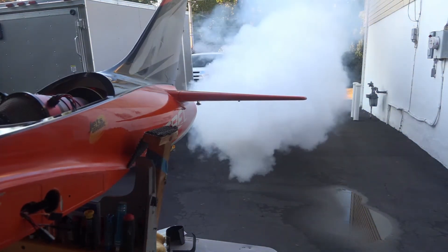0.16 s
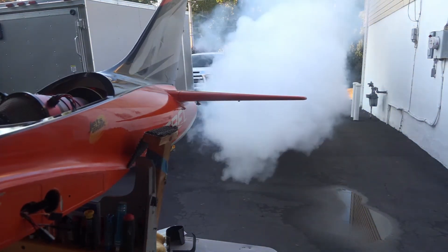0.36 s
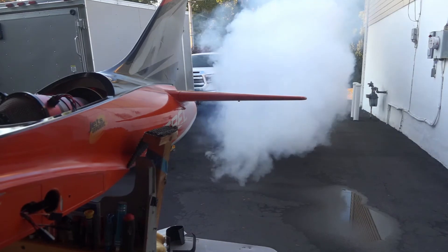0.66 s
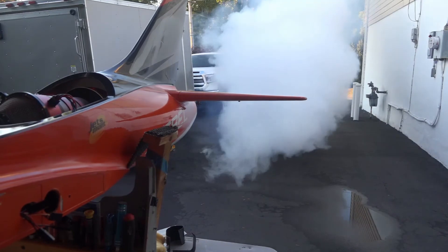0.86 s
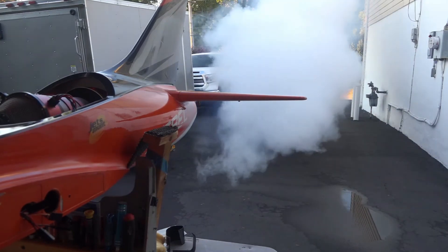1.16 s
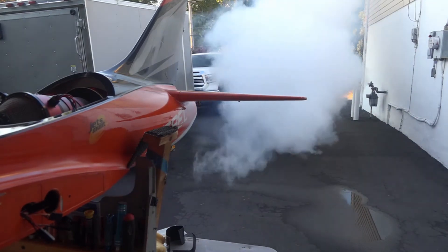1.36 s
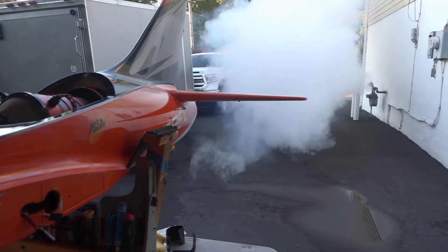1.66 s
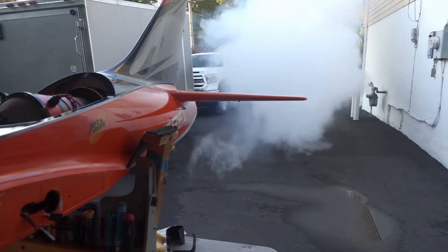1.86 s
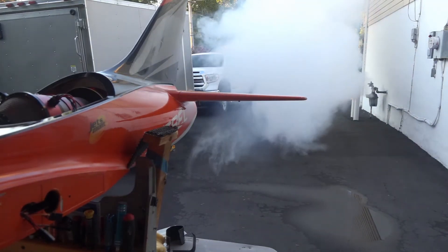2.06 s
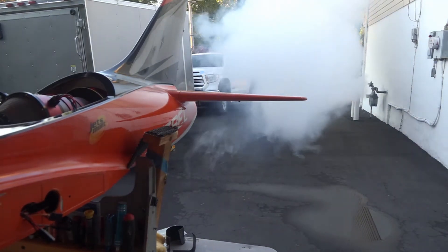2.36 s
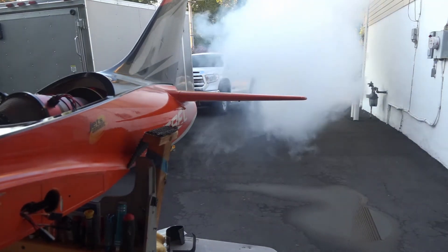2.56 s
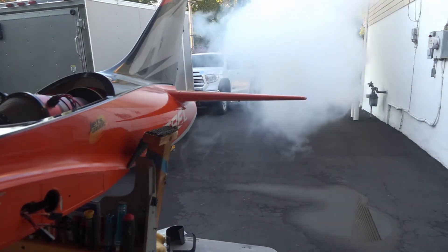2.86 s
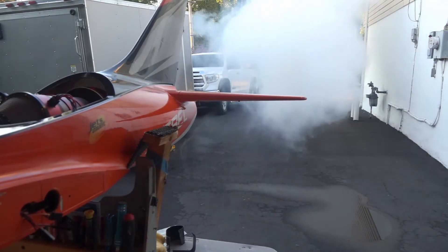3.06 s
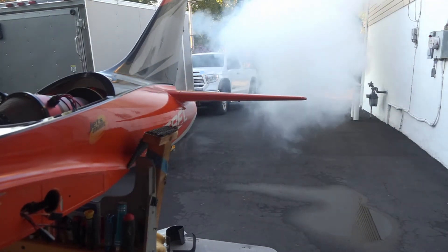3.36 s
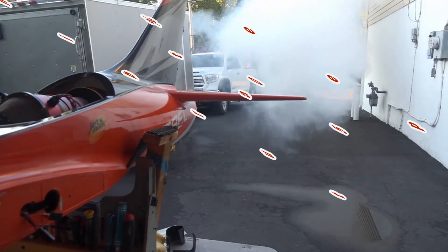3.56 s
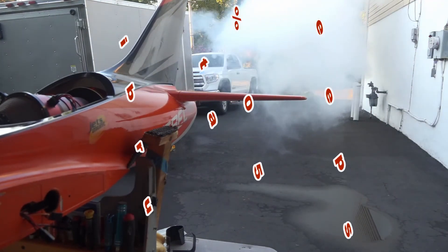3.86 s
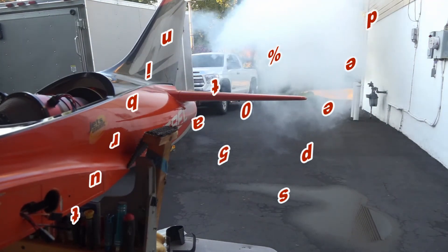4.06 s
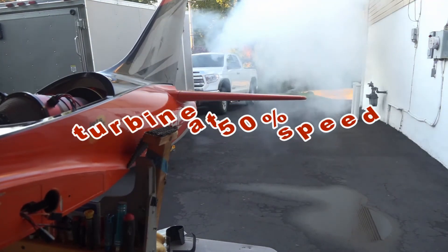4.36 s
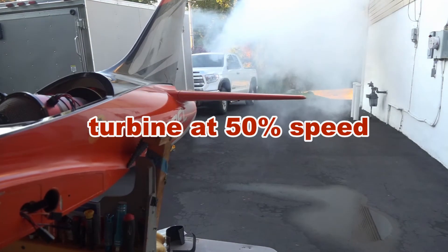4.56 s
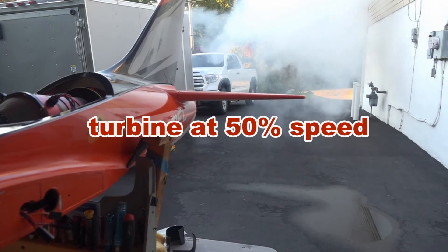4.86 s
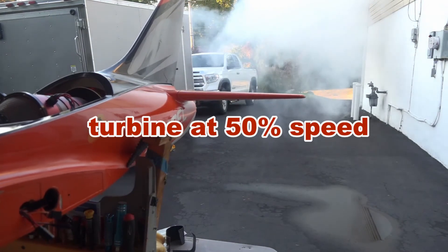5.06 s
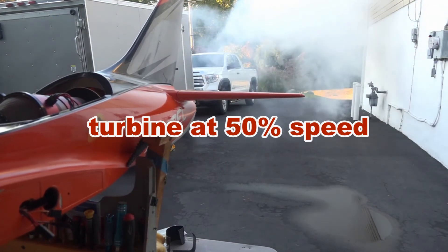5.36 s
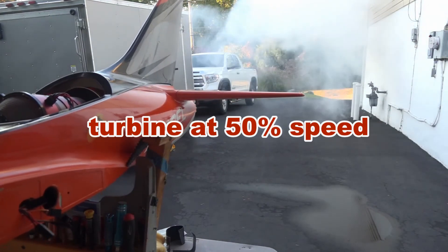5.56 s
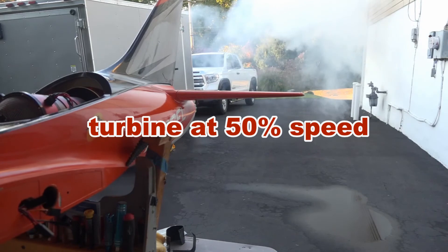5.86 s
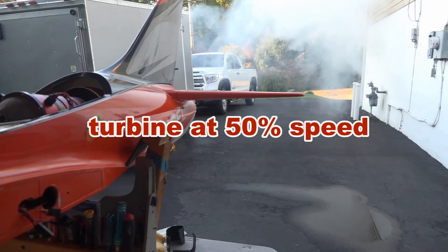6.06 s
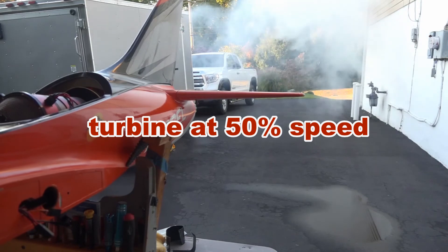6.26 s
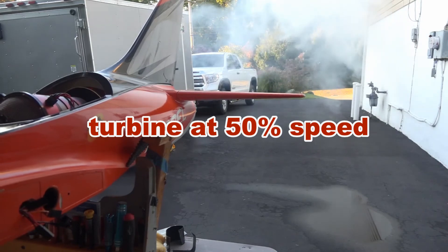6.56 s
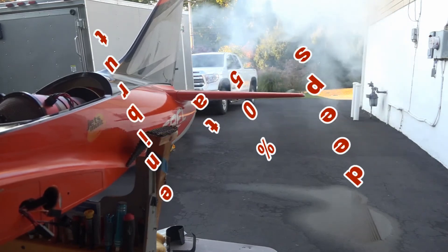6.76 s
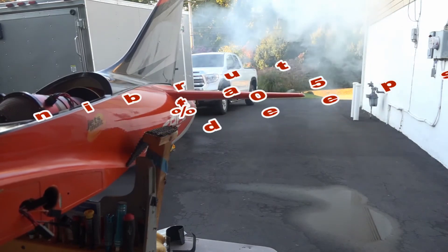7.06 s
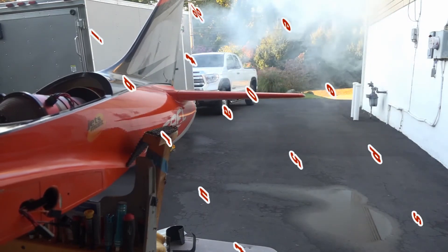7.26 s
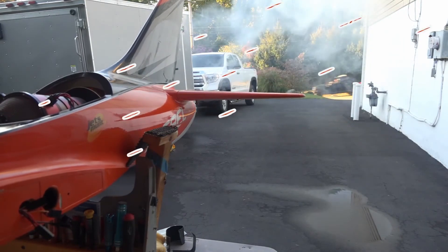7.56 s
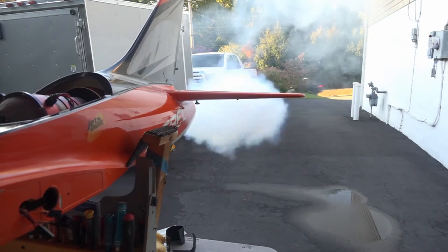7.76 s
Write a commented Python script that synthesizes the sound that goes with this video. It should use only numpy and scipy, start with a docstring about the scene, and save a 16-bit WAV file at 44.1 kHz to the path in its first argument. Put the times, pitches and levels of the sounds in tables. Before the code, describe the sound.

Outdoors on hard ground beside a wall, a small jet turbine is heard close up in stereo. From 0 to about 3.2 seconds it holds a low speed: a piercing whistle near 9 kHz dominates, with a fainter whine an octave below near 4.5 kHz, both trembling in hot turbulent air. Beneath is a broad, grainy exhaust roar and hiss, with a tiny spit near 1.6. From about 3.3 the turbine gathers speed; a soft low rumble swells around 4 to 4.5 and fades, with another short spit at 3.8. The tones glide up along an S-shaped curve, the upper passing out of hearing around 4.5 to 5. The exhaust grows brighter but is held back by automatic gain. By 6 to 7 seconds the lower whine eases to a strong, steadier pitch near 7.8 kHz, over continuous rushing exhaust until the end.

```python
"""A model jet's turbine on the tarmac beside a wall: first it holds a low speed, hunting gently.
Rotor tones at once and twice the turning rate flutter in hot, turbulent air over exhaust noise bands.
Past 3 s it spools up along an S-shaped ramp; low-passed noise rumbles briefly as fuel is added.
The exhaust changes colour with speed; the upper tone climbs past the cut-off, out of hearing.
It still drives the gain control, which pushes the exhaust down; the speed settles high."""
import sys
import numpy as np
from scipy.fft import rfft, irfft, next_fast_len
from scipy.io import wavfile
from scipy.ndimage import uniform_filter1d, minimum_filter1d

SR = 44100
rng = np.random.default_rng(int(sys.argv[2]) if len(sys.argv) > 2 else 0)


def file_out(sig):
    """Save sig as 16-bit WAV at sys.argv[1]."""
    # one column per channel
    cols = np.atleast_2d(sig).T
    # limit, then scale
    lim = np.clip(cols, -1, 1)
    pcm = np.round(lim * 32767).astype(np.int16)
    wavfile.write(sys.argv[1], SR, pcm)


N = 348390
TIME_S = np.arange(N) / SR
SIZE = next_fast_len(N + 4096)
HZ = np.maximum(np.arange(SIZE // 2 + 1) * SR / SIZE, 1)

# All half widths are to 1/e of the bump. Levels are ahead of the gain control.
# flame rumble as fuel is added: t/s, rms level/dB
FLAME = [(0, -72), (3.4, -63), (4.05, -46), (4.35, -43), (5, -54), (6.2, -71)]
# relative exhaust spectrum at low and high speed: f/Hz, density/dB
JET_SLOW = [(25, -29), (60, -14), (100, 5), (215, -15), (440, -5), (520, -0.5), (750, -8), (1500, 0),
            (1850, -2), (4100, -3), (4900, -1), (6200, 3), (7500, 0), (11000, -1.5)]
JET_FAST = [(25, -34), (60, -32), (100, -13), (215, -8), (450, -5), (530, -3), (700, -0.5), (1450, 2),
            (1750, -3.5), (3400, -2.5), (4400, 0.5), (6800, -1), (8400, 1), (11000, 0)]
# tailpipe and airframe resonances, on the same scale:
# f/Hz, width scale/Hz, level/dB at low, middle, high speed
PIPE = [(112, 27, 3, -5, -16), (162.4, 47, 19, 9, 7), (277.4, 51, 4, 1, -1), (313, 56, 1, 5, 2.5),
        (372.7, 65, -0.5, 4, 8.5), (508, 78, -1.5, 1, 0.5), (597, 18, 1.5, 2, -9), (656, 35, 2, -3, -23),
        (952, 278, 4.5, 2.5, -4), (1123, 125, -2.5, -5, 7), (1221, 83, 5.5, 5, 7), (1345, 60, 6, 10, 5),
        (1467, 36, 1, -15, 5), (1996, 200, -11, 0, -5.5), (4920, 230, 3, -19, -5)]
# low, middle, high speed: speed/(turns/s)
CORNER_SPEEDS = [4920, 6120, 7790]
# left-right correlation of the exhaust: f/Hz, correlation/1
LIKENESS = [(30, 0.53), (70, 0.74), (140, 0.94), (500, 0.93), (1400, 0.92), (2700, 0.82), (4500, 0.76),
            (10000, 0.98)]
# exhaust balance: f/Hz, left minus right level/dB
BALANCE = [(140, 0.3), (1200, -1.1), (4000, -0.5), (5500, 0), (8000, 0.5), (10500, 1)]
# reflections off ground, fuselage and wall: delay/s, gain/1
ECHOES = [(.00312, .13), (.00345, .11), (.0055, .06), (.0079, .08), (.0131, .04), (.0198, .04)]
# exhaust swells and sags: t/s, half width/s, rumble change/dB, roar change/dB, hiss change/dB
SURGES = [(0.014, 0.1, -4.5, -1, -.7), (.72, 0.18, 0.5, 1, 0.5), (1.94, .09, 3.5, .3, -0.2),
          (3.062, 0.14, -1.5, -1, -1.2), (3.274, .12, 3, 0, 0), (3.5, 0.049, -11, -.5, -2.2),
          (3.717, 0.21, -3.5, 0, -3.3), (4.1, 0.12, -5, 1, -1.5), (4.298, 0.11, -3.5, 0, -3.2),
          (4.825, .12, 2, 0, -0.5), (5.484, 0.13, 1, 1, 0), (6.083, 0.077, 5, 2.5, 1),
          (7.14, 0.098, -8, -.8, -0.5)]
# short exhaust spits: t/s, half width/s, hiss change/dB
SPITS = [(1.584, 0.0037, 7), (3.821, 0.005, 8)]
# source levels: rms level/dB at low, middle, high speed
RUMBLE_DB = (-29.5, -22.5, -26)
ROAR_DB = (-25, -15, -14.5)
HISS_DB = (-20, -10.5, -7.5)
WHINE_DB = (-28, -23, -5.5)
# direct and reflected paths adding or cancelling, whine: speed/(turns/s), half width/(turns/s), level/dB
WHINE_PATHS = [(5100, 190, 2.5), (5760, 230, 7), (6130, 140, -9), (6500, 32, 0), (6980, 60, -4),
               (7170, 80, 2.5)]
# same for the shriek: speed/(turns/s), half width/(turns/s), left level/dB, right level/dB
SHRIEK_PATHS = [(4684, 88, 3.5, 3), (4970, 70, 2.5, -15), (5050, 150, -11.5, -7.5), (5330, 57, 0, 3),
                (6430, 150, 4.5, 4)]
# shriek leaning right at low speed: t/s, half width/s, left minus right level/dB
SHRIEK_PAN = [(1.5, 0.83, -2.5)]

LOW_TURNS_PER_S, HIGH_TURNS_PER_S = 4490, 7852.5
THROTTLE_UP_S, SPOOL_S, EASE_IN, EASE_OUT = 3.259, 3.969, 1.849, 3.386
HUNT_TURNS_PER_S, HUNT_PERIOD_S = 12, 3.1   # the governor lets the low speed swell and sink
HOLLOW_HZ, HOLLOW_WIDTH_HZ, HOLLOW_DB = 2820, 214, -4   # dip in the jet spectrum
SHRIEK_DB, SHRIEK_DB_PER_OCTAVE = -8, 14.5   # rms at LOW_TURNS_PER_S, growth with speed
SCATTER, SCATTER_DB_PER_DB = 0.076, 0.7   # scattered share; its rise per dB of path cancellation
FADE_HZ = 15   # pace of the large eddies
PORT_LAG_S = 2.3e-5   # right port after left
AGC_THRESHOLD_DB, AGC_SHARE, AGC_WINDOW_S = -9.5, .9, 0.17   # rms, share of excess removed
CUTOFF_HZ = 11020


def from_db(db):
    """Decibels to gain."""
    return 10 ** (np.asarray(db) / 20)


def rms_one(x):
    """Scale to unit rms."""
    return x / np.sqrt(np.mean(x ** 2) + 1e-20)


def in_time(rows):
    """Each column of a time table, interpolated per sample."""
    t_s, *columns = np.transpose(rows)
    return [np.interp(TIME_S, t_s, column) for column in columns]


def in_frequency(points):
    """A spectrum per bin, interpolated over log frequency."""
    hz, value = np.transpose(points)
    return np.interp(np.log(HZ), np.log(hz), value)


def bumps(along, rows):
    """Sum of Gaussian bumps from rows of (centre, half width, heights ..): one curve per height."""
    return sum(np.outer(heights, np.exp(-((along - centre) / width) ** 2))
               for centre, width, *heights in rows)


def white():
    """Spectrum of a fresh white noise."""
    return rfft(rng.standard_normal(SIZE))


def eddies(rate_hz):
    """Turbulent wandering of unit rms, fading above the given rate."""
    return rms_one(irfft(white() / (1 + (HZ / rate_hz) ** 2), SIZE)[:N])


def flame(top_hz):
    """Combustion rumble: band-limited noise, partly different at each ear."""
    pair = white() + .5 * white() * [[1], [-1]]
    pair = pair * HZ / (HZ + 150) / (1 + (HZ / top_hz) ** 4)
    level_db = in_time(FLAME)[0]
    return from_db(level_db) * rms_one(irfft(pair, SIZE)[:, :N])


def jet_noise(colour_db, mode_db):
    """Stereo spectrum of mixing noise plus pipe resonances, rippled by reflections."""
    hollow_db = HOLLOW_DB * np.exp(-((HZ - HOLLOW_HZ) / HOLLOW_WIDTH_HZ) ** 2)
    power = from_db(colour_db + hollow_db) ** 2
    for (hz, width_hz, *_), db in zip(PIPE, mode_db):
        offset = ((HZ - hz) / width_hz) ** 2
        power = power + from_db(db) ** 2 / (1 + 2.0 * offset + 3.0 * offset ** 2) ** 2

    alike = np.clip(in_frequency(LIKENESS), 0, .99)
    pair = np.sqrt(1 + alike) * white() + np.sqrt(1 - alike) * white() * [[1], [-1]]
    pair[1] *= np.exp(-2j * np.pi * HZ * PORT_LAG_S)
    pair *= from_db(in_frequency(BALANCE) / 2 * [[1], [-1]])

    paths = np.zeros(SIZE)
    for delay_s, gain in [(0.00014, 1)] + ECHOES:   # direct path first
        paths[round(delay_s * SR)] = gain
    return pair * np.sqrt(power) * rfft(paths)


def exhaust(speed):
    """Rumble, roar and hiss: jet noise in three bands, crossfading in colour with rotor speed."""
    slow, fast = in_frequency(JET_SLOW), in_frequency(JET_FAST)
    colours = (slow, (slow + fast) / 2, fast)
    modes = np.transpose(PIPE)[2:]
    states = [jet_noise(colour, mode_db) for colour, mode_db in zip(colours, modes)]
    shares = [np.interp(speed, CORNER_SPEEDS, corner) for corner in np.eye(len(states))]
    rumble_db, roar_db, hiss_db = bumps(TIME_S, SURGES)
    surge = eddies(19)   # shared by all bands

    def band(low_hz, high_hz, level_db, events_db, surge_db):
        """One band, its level following speed, events and shared turbulence."""
        inside = (HZ >= low_hz) & (HZ < high_hz)
        blend = 0
        for share, state in zip(shares, states):
            blend = blend + np.sqrt(share) * rms_one(irfft(state * inside, SIZE)[:, :N])
        speed_db = np.interp(speed, CORNER_SPEEDS, level_db)
        return blend * from_db(speed_db + events_db + surge_db * surge)

    rumble = band(15, 220, RUMBLE_DB, rumble_db, surge_db=-0.6)
    roar = band(220, 1700, ROAR_DB, roar_db, surge_db=1.12)
    hiss = band(1700, 12000, HISS_DB, hiss_db + bumps(TIME_S, SPITS), surge_db=0.8)
    return rumble + roar + hiss


def shaft_speed():
    """Turns per second: hunting gently, then gathering speed and easing into the high setting."""
    ramp = np.clip((TIME_S - THROTTLE_UP_S) / SPOOL_S, 0, 1)
    to_go = (1 - ramp ** EASE_IN) ** EASE_OUT
    low = LOW_TURNS_PER_S + HUNT_TURNS_PER_S * np.abs(np.sin(np.pi * TIME_S / HUNT_PERIOD_S))
    return HIGH_TURNS_PER_S + to_go * (low - HIGH_TURNS_PER_S)


def rotor_tone(speed, order, flutter, flutter_hz, apart, fade_db):
    """A multiple of the turning rate; eddies scatter level and phase, partly otherwise at each ear."""
    turns = np.cumsum(speed) / SR - speed * PORT_LAG_S * np.array([[0], [1]])
    shared, own_left, own_right = (eddies(flutter_hz) + 1j * eddies(flutter_hz) for _ in range(3))
    scatter = flutter * (shared + apart * np.array([own_left, own_right]))
    # now and then a large hot eddy bends the beam away
    large = 0.7 * eddies(FADE_HZ) + .5 * np.array([eddies(FADE_HZ), eddies(FADE_HZ)])
    fade = from_db(-fade_db * np.maximum(large - .5, 0) ** 2)
    carrier = np.exp(2j * np.pi * order * turns)
    return np.sqrt(2) * fade * np.real((1 + scatter) * carrier)


def whine(speed):
    """Once-a-turn tone: louder and steadier with speed, coloured by path interference."""
    flutter = np.interp(speed, CORNER_SPEEDS, [.23, .12, .05])
    level_db = np.interp(speed, CORNER_SPEEDS, WHINE_DB) + bumps(speed, WHINE_PATHS)
    tone = rotor_tone(speed, order=1, flutter=flutter, flutter_hz=40, apart=1.0, fade_db=1.4)
    return from_db(level_db) * tone


def shriek(speed):
    """Twice-a-turn tone, growing with speed; its scattered share rises where the paths cancel."""
    paths_db = bumps(speed, SHRIEK_PATHS)
    pan_db = bumps(TIME_S, SHRIEK_PAN) / 2 * np.array([[1], [-1]])
    growth_db = SHRIEK_DB_PER_OCTAVE * np.log2(speed / LOW_TURNS_PER_S)
    level_db = SHRIEK_DB + growth_db + pan_db + paths_db
    cancelled_db = np.minimum(paths_db.mean(axis=0), 0)
    flutter = SCATTER * from_db(-SCATTER_DB_PER_DB * cancelled_db)
    tone = rotor_tone(speed, order=2, flutter=flutter, flutter_hz=42.8, apart=1.0, fade_db=2.0)
    return from_db(level_db) * tone


def scene():
    """Exhaust and flame under the rotor's two tones."""
    speed = shaft_speed()
    return exhaust(speed) + flame(top_hz=95) + whine(speed) + shriek(speed)


def gain_control(x):
    """Cuts most of the mean power's excess over the threshold: exhaust sinks as the shriek swells."""
    power = uniform_filter1d(np.mean(x ** 2, axis=0), max(int(AGC_WINDOW_S * SR), 1))
    excess_db = np.maximum(10 * np.log10(np.abs(power) + 1e-12) - AGC_THRESHOLD_DB, 0)
    return x * from_db(-np.clip(AGC_SHARE, 0, 1) * excess_db)


def record(dry):
    """Recorder chain: gain control, quick peak limiter, steep low-pass."""
    held = gain_control(dry)
    room = np.minimum(1, .95 / (np.abs(held).max(axis=0) + 1e-9))
    gain = uniform_filter1d(minimum_filter1d(room, size=129), size=129)
    passband = 1 / np.sqrt(1 + np.minimum(HZ / CUTOFF_HZ, 1.5) ** 700)
    return irfft(rfft(held * gain, SIZE) * passband, SIZE)[:, :N]


dry = scene()
out = record(dry)
file_out(out)
```